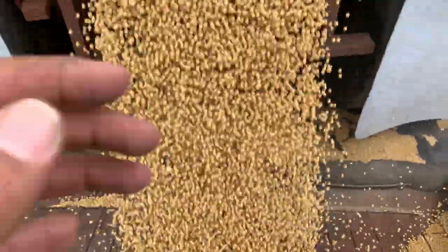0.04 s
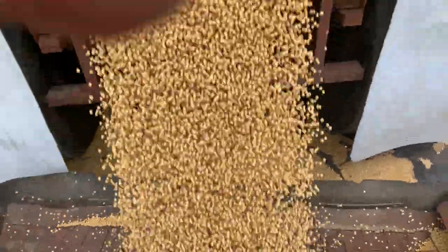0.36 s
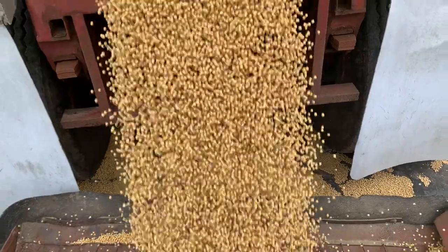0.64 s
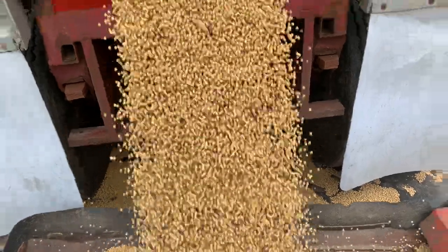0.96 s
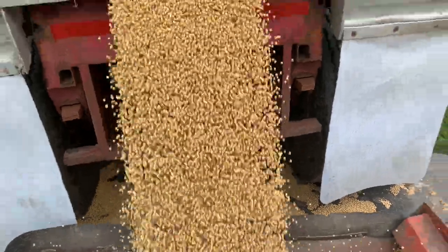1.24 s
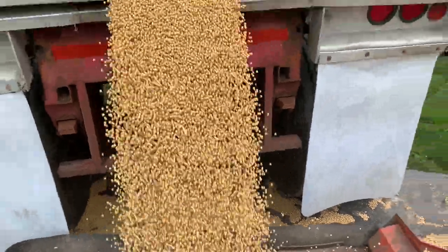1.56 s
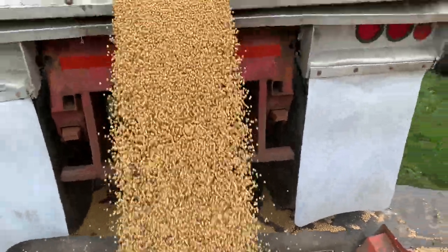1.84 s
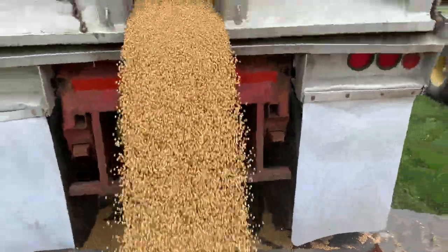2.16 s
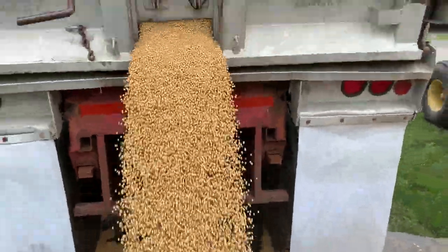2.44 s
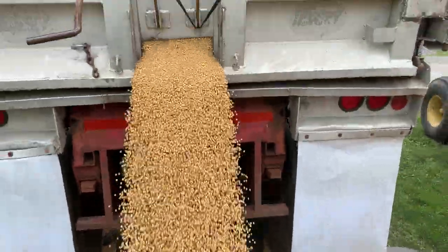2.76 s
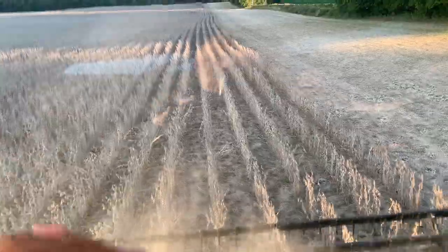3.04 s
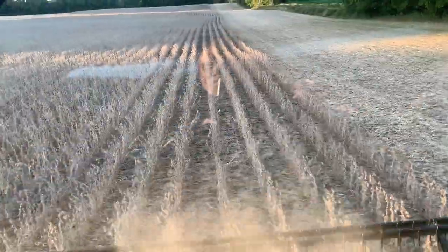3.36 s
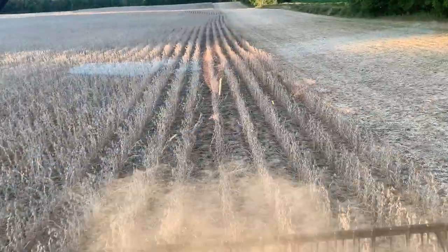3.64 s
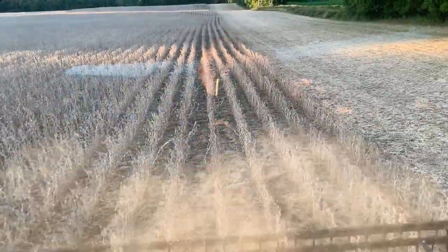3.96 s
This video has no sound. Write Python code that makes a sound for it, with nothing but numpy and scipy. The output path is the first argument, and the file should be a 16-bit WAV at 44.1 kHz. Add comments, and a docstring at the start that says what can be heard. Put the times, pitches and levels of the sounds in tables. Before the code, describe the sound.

A close stream of dry beans hisses into a hopper with soft thumps, its treble easing as the microphone backs away. After a sudden cut comes a harvester cab, with engine hum, low rumble and muffled threshing hiss.

```python
"""Dry beans rush from a trailer's gate into a hopper: thousands of tiny impacts a second, with the
hopper drumming and thumping under them and a motor humming. Early on, a passing hand briefly cups
the sound; treble and hum fade as the listener backs away. The pour cuts to a moment of silence.
Then the cab of a harvester: wavering engine tones, low rumble and the muffled hiss of threshed
chaff. Near the end, something loose gives a quick double click."""
import sys
import numpy as np
from scipy import signal
from scipy.fft import rfft, irfft
from scipy.io import wavfile
from scipy.ndimage import map_coordinates

SR = 44100
rng = np.random.default_rng(int(sys.argv[2]) if len(sys.argv) > 2 else 0)


def dump(signal):
    """Clip the signal to [-1, 1] and save it as 16-bit WAV at the path in sys.argv[1]."""
    limited = np.clip(np.atleast_2d(signal).T, -1, 1)
    pcm = np.round(limited * 32767).astype(np.int16)
    wavfile.write(sys.argv[1], SR, pcm)


N = 176400
T = np.arange(N) / SR
HZ = np.fft.rfftfreq(N, 1 / SR)
CUT_S, CAB_S = 2.8655, 2.9245  # the pour stops, the cab begins


def beans():
    """Beans click on each other and on the heap in loose clumps, blurring into a bright rush."""
    # tone of the impacts (frequency [Hz], level [dB])
    impact_eq = [(350, -21), (600, -8.5), (860, -6.5), (1050, -6.5), (1400, -5.5), (2200, -6), (3300, -3.5),
                 (4600, -1.9), (6400, -0.36), (7400, -0.55), (8400, -2), (9800, -2), (10800, -5),
                 (13000, -9), (15600, -12.5)]
    # narrow resonances in the rush (frequency [Hz], width [Hz], lift [dB])
    peaks = [(9690, 300, 2.6), (6980, 300, 1.1), (4600, 300, 1.7), (3460, 250, 1.0)]
    # swell of the stream (time [s], level [dB])
    flow = [(0, 0), (.3, 0.7), (.68, 0), (.79, 0.8), (.92, 0.4), (1.19, 0.45), (1.42, -0.2), (1.65, 0.06),
            (2.3, -0.15), (2.86, -0.7)]
    dulling_hz, dulling_db_per_s = 11600, 1.7
    lift = sum(db / (1 + (2 * (HZ - hz) / width) ** 2) for hz, width, db in peaks)
    clicks = clumps(impacts(per_s=33000, spread_db=2.5), depth_db=.55, rate_hz=25)
    rush = unit(colour(clicks, spectrum(impact_eq) + lift))
    rush = reflected(rush, db=-15, longest_s=.008, drift=.0008)
    # the top treble starts lifted and fades as the listener backs away
    top = irfft(rfft(rush) * (1 - 1 / (1 + (HZ / dulling_hz) ** 12)), N)
    rush = rush + top * (amp(dulling_db_per_s * (CUT_S / 2 - T)) - 1)
    return rush * amp(-17.5 + curve(flow) + .19 * wander(rate_hz=58))


def cupped(x):
    """A hand passes the microphone and colours the rush; the hollow rings higher as it draws off."""
    # tone with the hand at its closest (frequency [Hz], gain [dB])
    cupped_eq = [(1800, 0.5), (2200, 0), (2900, 2), (3600, 2.5), (4400, -0.8), (6000, -1), (7500, .5),
                 (9500, 0), (11000, -3), (13000, 0), (14800, 2), (16000, 2)]
    closest_s, reach_s, octaves_per_s = .69, .17, 2.4
    nearness = np.exp(-((T - closest_s) / reach_s) ** 2)
    hollow_hz = 2810 * 2 ** np.clip(octaves_per_s * (T - closest_s), -.5, .5)
    hollow = amp(4) * resonate(x, hollow_hz, width_hz=200)
    return x + nearness * (colour(x, spectrum(cupped_eq)) - x + hollow)


def hopper():
    """The weight of the falling beans drums and booms on the hopper in uneven lumps."""
    # body of the drumming (frequency [Hz], level [dB])
    drum_eq = [(25, -36), (70, -24), (120, -10), (210, -2.5), (330, 1), (480, -3.5), (700, -11.5),
               (1200, -29), (3000, -60)]
    # tone of the deep boom (frequency [Hz], level [dB])
    boom_eq = [(25, -38), (42, -27), (70, -7), (105, -1), (160, -.5), (220, -8), (400, -30), (3000, -70)]
    # fade of the boom (time [s], level [dB])
    boom_fade = [(0, -32), (.8, -34.5), (1.3, -35), (1.6, -37.5), (2.85, -38)]
    drum_db, fade_db_per_s = -31.5, .38
    drum_hits = impacts(per_s=3000, spread_db=2) * amp(1.15 * wander(rate_hz=19))
    boom_hits = impacts(per_s=1500, spread_db=2) * amp(wander(rate_hz=14))
    drum = unit(colour(drum_hits, spectrum(drum_eq)))
    boom = unit(colour(boom_hits, spectrum(boom_eq)))
    return drum * amp(drum_db - fade_db_per_s * T) + boom * amp(curve(boom_fade))


def thumps():
    """Heavier slumps of beans push the hopper's damped low modes."""
    # slumps (time [s], level [dB], pitch [Hz])
    slumps = [(.081, -27.5, 150), (.143, -32, 149.4), (.356, -27, 116), (.765, -25.5, 145),
              (1.165, -23.5, 150), (1.31, -23.5, 146), (2.44, -26.5, 387)]
    # modes of a thump (frequency [multiple of the pitch], level [dB])
    modes = [(.8, -6), (1.05, 0), (1.3, -9), (1.9, -12)]
    rise_s = .0129
    knocks = 0
    for start, db, hz in slumps:
        rises = np.maximum(T - start, 0) / rise_s
        envelope = (rises * np.exp(1 - rises)) ** 2
        phase = 2 * np.pi * hz * (T - start - rise_s)
        ring = sum(amp(mode_db) * np.sin(k * rng.uniform(.97, 1.05) * phase) for k, mode_db in modes)
        knocks += amp(db) * ring * envelope
    return knocks


def drone():
    """The harvester's engine and shafts hum, drifting together in pitch while each tone sways."""
    # engine and shaft tones (frequency [Hz], level [dB], unsteadiness [0-1])
    tones = [(115.4, -24.5, .45), (53, -34.5, 0.2), (199.4, -34, 0.6), (270.3, -36.5, .6),
             (507, -41.5, 0.7), (619.5, -45.5, 0.8), (851, -45.5, 1), (1216, -51.5, .9)]
    clock = np.cumsum(1 + .0041 * wander(rate_hz=4)) / SR
    hum = 0
    for hz, db, unsteady in tones:
        sway = 1 + unsteady * (wander(rate_hz=9.4) + 1j * wander(rate_hz=10))  # level and phase
        tone = (sway * np.exp(2j * np.pi * (hz * clock + rng.random()))).real
        hum += amp(db) * tone / tone[T > CAB_S].std()
    return hum


def rumble():
    """A deep, gently heaving bed of noise fills the cab."""
    # tone of the rumble (frequency [Hz], level [dB])
    cab_eq = [(15, -17), (29, -5), (39, -9.5), (52, 1), (90, 1), (130, -4), (160, -8.5), (250, -9.5),
              (380, -7.5), (480, -16), (680, -19.5), (980, -19.5), (1120, -28), (1500, -38), (3000, -60)]
    bed = colour(rng.standard_normal(N), spectrum(cab_eq)) * amp(.88 * wander(rate_hz=12))
    return amp(-22.5) * bed / bed[T > CAB_S].std()


def chaff():
    """Stalks and chaff tick through the machine, merging into a muffled hiss."""
    # tone of the threshing (frequency [Hz], level [dB])
    chaff_eq = [(650, -34), (1100, -5.5), (1230, -2), (1550, -8), (2000, -7.5), (2550, -7.5), (3000, -12),
                (3700, -13.5), (5600, -16.5), (7800, -20.5), (10600, -20.5), (15600, -30)]
    ticks = clumps(impacts(per_s=9000, spread_db=1), depth_db=.8, rate_hz=12)
    hiss = reflected(colour(ticks, spectrum(chaff_eq)), db=-9, longest_s=.010, drift=.0001)
    return hiss * amp(-38.5 + .4 * wander(rate_hz=20))


def motor():
    """A steady motor hums under the pour, fading as the listener backs away."""
    # partials of the hum (frequency [multiple of the pitch], starting level [dB])
    partials = [(.5, -68), (1, -34.5), (2, -44.5)]
    pitch_hz, fade_db_per_s = 63.2, 2
    turns = np.cumsum(pitch_hz * (1 + .003 * wander(rate_hz=2.4))) / SR
    hum = sum(amp(db) * np.sin(2 * np.pi * (k * turns + rng.random())) for k, db in partials)
    return np.sqrt(2) * hum * amp(-fade_db_per_s * T)


def rattle():
    """A loose part of the cab clicks twice and rings briefly."""
    # clicks (time [s], level [dB])
    clicks = [(3.917, -34), (3.927, -40)]
    # modes of the part (frequency [Hz], level [dB], time to fall 60 dB [s])
    modes = [(1350, 4, .05), (1745, -4, .04), (2450, -4, .04), (3030, -2, .06), (3280, 0, .05)]
    clatter = 0
    for start, db in clicks:
        age = np.maximum(T - start, 0)
        ring = sum(amp(mode_db - 60 * age / t60) * np.sin(2 * np.pi * (hz * age + rng.random()))
                   for hz, mode_db, t60 in modes)
        clatter += amp(db) * ring * np.minimum(age / .002, 1)
    return clatter


def impacts(per_s, spread_db):
    """A dense train of clicks of random sign; a few are stronger than the rest."""
    hits = rng.random(N) < per_s / SR
    size = np.minimum(rng.exponential(1, N), 5)
    return unit(hits * rng.choice([-1., 1.], N) * amp(spread_db * size))


def clumps(x, depth_db, rate_hz, count=9):
    """Lets each of several bands swell and sink on its own."""
    place = np.interp(np.log(HZ + 1), np.log([400, 16000]), [0, count - 1])
    bands = (irfft(rfft(x) * np.maximum(1 - abs(place - k), 0), N) for k in range(count))
    return sum(band * amp(depth_db * wander(rate_hz)) for band in bands)


def reflected(x, db, longest_s, drift, count=14):
    """Adds short echoes off nearby panels; their delays drift (s per s) as the listener moves."""
    echoes = 0
    for when, polarity, way in rng.uniform(-1, 1, (count, 3)):
        delay = longest_s * (.6 + .4 * when) + drift * way * T
        echoes += np.sign(polarity) * map_coordinates(x, [(T - delay) * SR], order=3, mode="wrap")
    return unit(x + amp(db) * echoes / np.sqrt(count))


def resonate(x, hz, width_hz):
    """A resonance of gain 1 that sweeps along the curve hz."""
    turn = np.exp(2j * np.pi * np.cumsum(hz) / SR)
    pole = np.exp(-np.pi * width_hz / SR)
    return 2 * (turn * signal.lfilter([1 - pole], [1, -pole], x / turn)).real


def wander(rate_hz):
    """Smooth random motion of rms 1, up to about the given rate."""
    lowpass = (HZ > 0) / (1 + (HZ / rate_hz) ** 4)
    return unit(irfft(rfft(rng.standard_normal(N)) * lowpass, N))


def colour(x, db):
    """Equalises with a gain for each frequency."""
    return irfft(rfft(x) * amp(db), N)


def spectrum(points):
    """Joins (Hz, dB) points on a log-frequency axis."""
    hz, db = np.transpose(points)
    return np.interp(np.log(HZ + 1), np.log(hz + 1), db)


def curve(points):
    """Joins (s, value) points by straight lines."""
    return np.interp(T, *np.transpose(points))


def amp(db):
    """Decibels to gain."""
    return 10 ** (np.asarray(db) / 20)


def unit(x):
    """Scales to an rms of 1."""
    return x / np.sqrt(np.mean(x ** 2) + 1e-20)


def scene():
    """The pour, a short silence, then the cab; both channels are alike."""
    fade_s = .0005
    pour = cupped(beans()) + hopper() + thumps() + motor()
    cab = drone() + rumble() + chaff() + rattle()
    mix = pour * np.clip((CUT_S - T) / fade_s, 0, 1) + cab * np.clip((T - CAB_S) / fade_s, 0, 1)
    return np.array([mix, mix])


def record(dry):
    """A steep low-pass trims the highest treble."""
    lowpass = signal.firwin(1023, 15780, window=("kaiser", 9), fs=SR)
    return signal.oaconvolve(dry, lowpass[None], "same")


dry = scene()
out = record(dry)
dump(out)
```